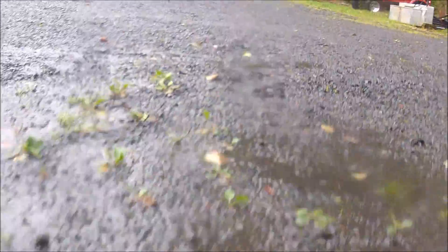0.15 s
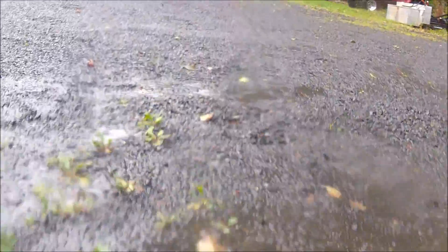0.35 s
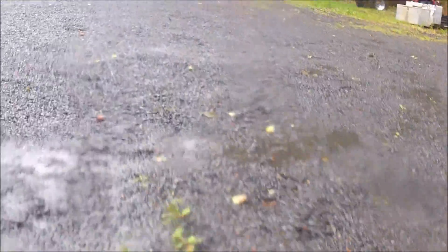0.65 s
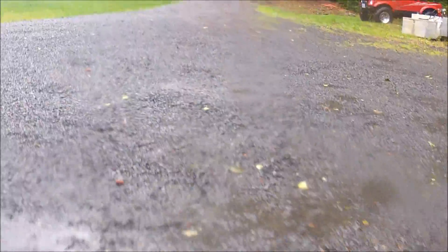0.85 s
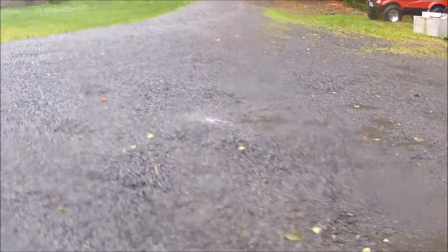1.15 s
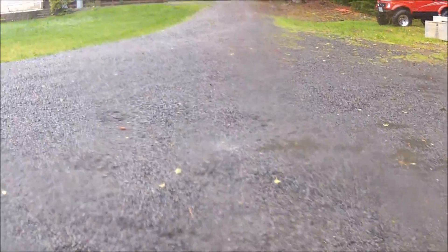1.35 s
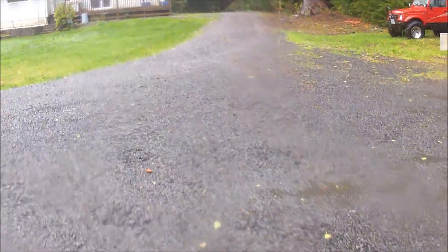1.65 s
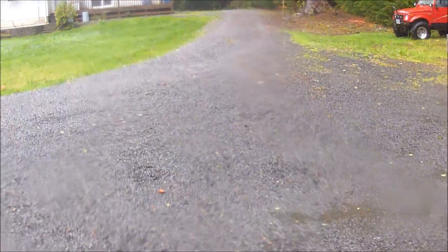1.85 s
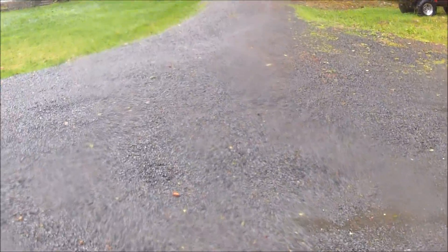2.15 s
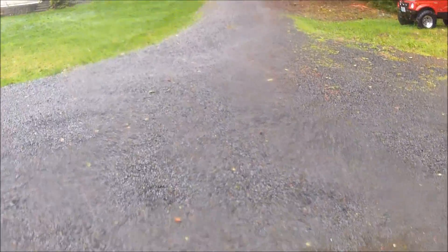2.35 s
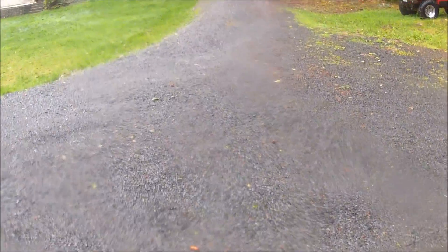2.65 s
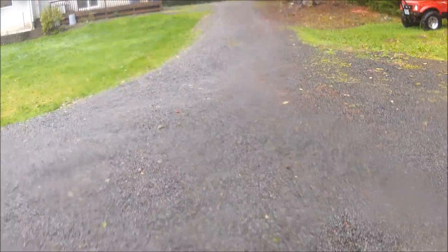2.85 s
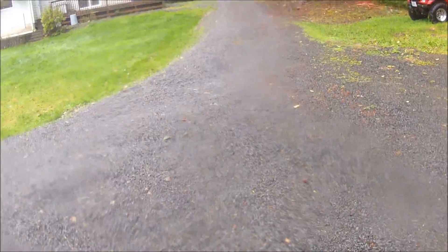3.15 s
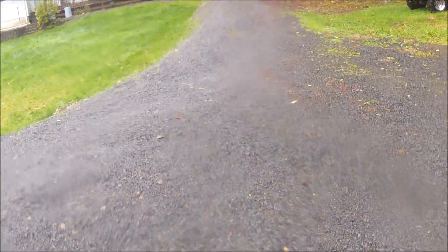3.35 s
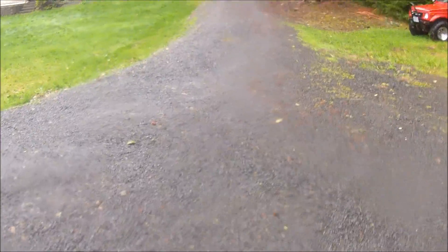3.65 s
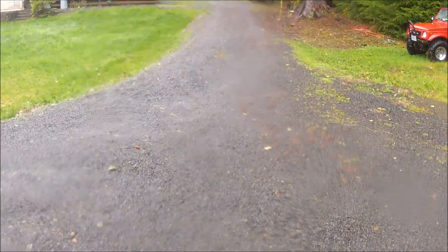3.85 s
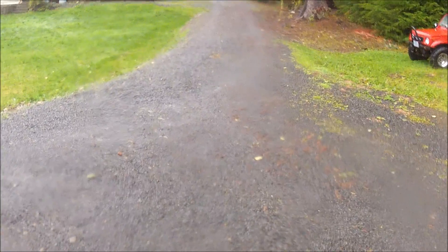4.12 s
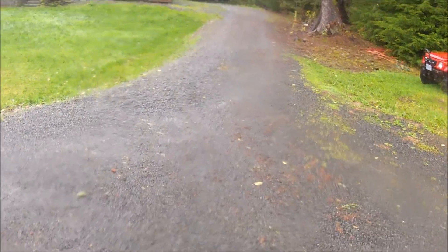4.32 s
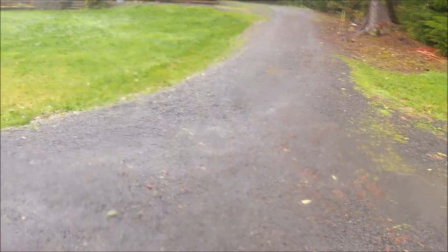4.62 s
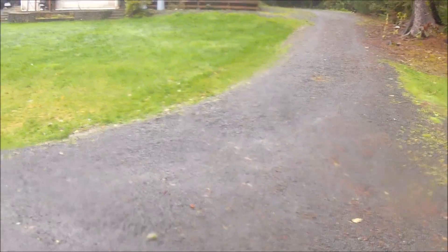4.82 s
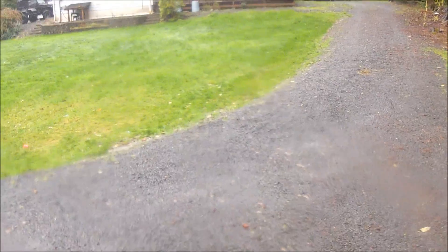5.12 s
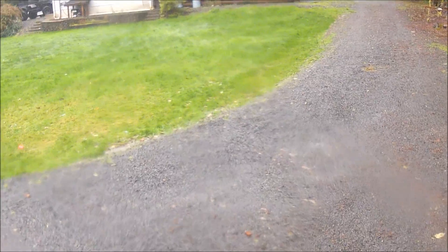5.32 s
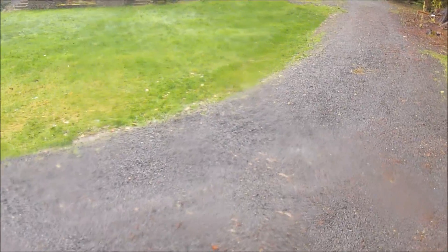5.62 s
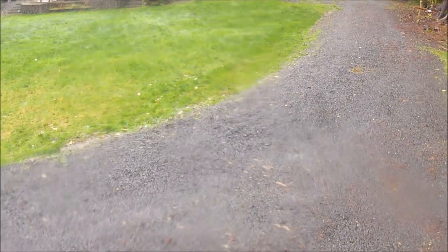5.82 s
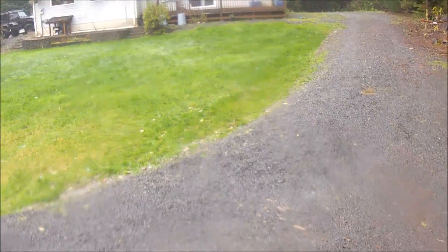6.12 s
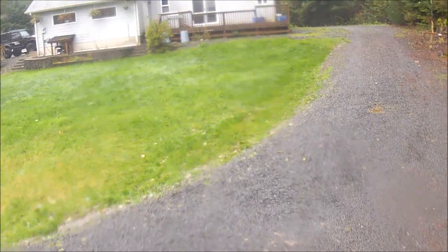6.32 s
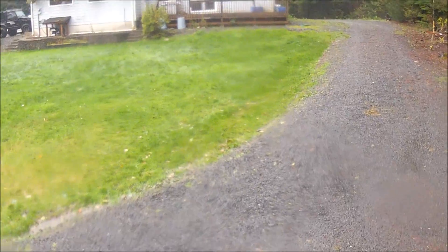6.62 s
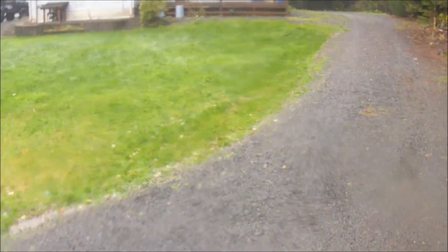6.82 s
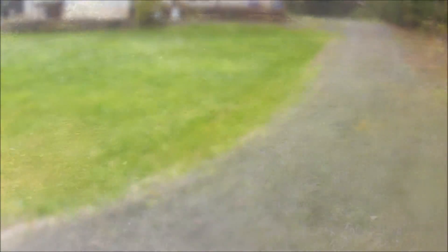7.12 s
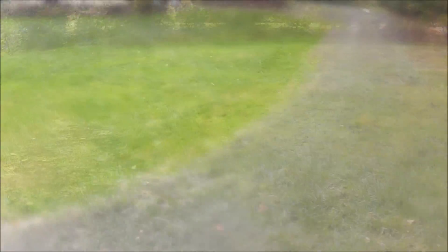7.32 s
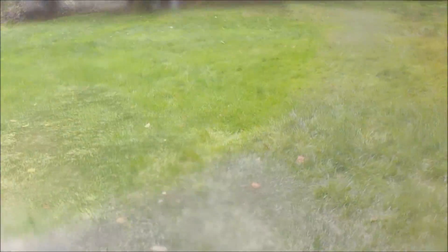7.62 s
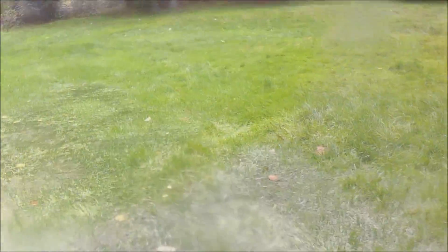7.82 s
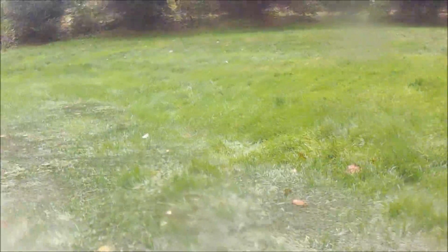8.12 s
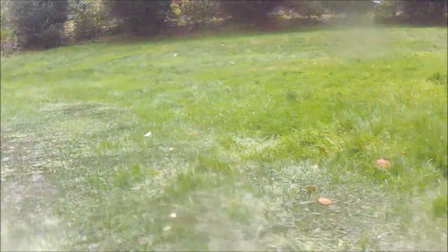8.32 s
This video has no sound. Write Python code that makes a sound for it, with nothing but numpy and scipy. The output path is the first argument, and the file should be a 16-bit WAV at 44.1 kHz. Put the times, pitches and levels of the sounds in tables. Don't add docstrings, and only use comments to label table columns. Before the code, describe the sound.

A small four-rotor drone hums and whines unsteadily, its propellers hissing, with low wind gusts rumbling through, fading quieter toward the end.

```python
import sys
import numpy as np
from scipy import signal
from scipy.fft import rfft, irfft
from scipy.io import wavfile
from scipy.ndimage import uniform_filter1d

SR = 44100
rng = np.random.default_rng(int(sys.argv[2]) if len(sys.argv) > 2 else 0)


def to_linear_factor(level_db):
    exponent = np.asarray(level_db, float) / 20
    return 10 ** exponent


def file_out(sig):
    cols = np.atleast_2d(sig).T
    lim = np.clip(cols, -1, 1)
    pcm = np.round(lim * 32767).astype(np.int16)
    wavfile.write(sys.argv[1], SR, pcm)


N = 373527
STEP_RATE = 12000
STEPS = N * STEP_RATE // SR + 40
WHINE_ORDER = 42

# (frequency [Hz], level per Hz [dB])
SHELL_RESONANCES = [(330, -51), (560, -20.5), (614, -25), (667, -14), (706, -9.5), (859, -14.5),
                    (1010, -3.5), (1110, -7.5), (1330, -1.5), (1520, -10.5), (1700, 0), (2000, -8),
                    (2170, -8), (2700, -14), (3000, -23.5), (3900, -61), (6600, -120)]


def in_time(rows):
    s, *columns = np.transpose(rows)
    t = np.arange(STEPS) / STEP_RATE
    return np.array([np.interp(t, s, column) for column in columns])


def at_hz(points, hz):
    point_hz, point_db = np.array(points).T
    return np.interp(np.log(hz), np.log(point_hz), point_db)


def rms_one(x):
    return x / np.sqrt(np.mean(x ** 2))


def drift(rate):
    r = np.exp(-2 * np.pi * rate / STEP_RATE)
    noise = rng.standard_normal(STEPS + 6000)
    slow = signal.lfilter([1], [1, -2 * r, r * r], noise)[6000:]
    return rms_one(slow - slow.mean())


def surges(rows):
    t = np.arange(STEPS) / STEP_RATE
    return sum(swing * np.cos(np.pi * np.clip((t - top) / length, -.5, .5)) ** 2
               for top, swing, length in rows)


def coloured(x, spectrum):
    hz = np.arange(STEPS // 2 + 1) * STEP_RATE / STEPS + 1
    inside = (hz > spectrum[0][0]) & (hz < spectrum[-1][0])
    return rms_one(irfft(rfft(x) * to_linear_factor(at_hz(spectrum, hz)) * inside, STEPS))


def tone(turns, multiple, flutter_db, rate):
    strength = np.sqrt(2) * to_linear_factor(flutter_db * drift(rate))
    return strength * np.sin(2 * np.pi * (multiple * turns + rng.random()))


def shaft_speeds():
    # (time [s], shaft speed [Hz])
    trim_a = [(0, 83), (.26, 87.5), (.79, 84), (1.44, 83.8), (1.8, 81.3), (2.07, 83), (2.3, 82.5),
              (2.55, 75.8), (2.72, 82.3), (3.82, 82.5), (4.1, 84.4), (4.5, 83.4), (4.86, 80.3),
              (5.36, 82.5), (5.85, 78.6), (6.28, 82.5), (6.68, 79), (8.47, 79)]
    trim_b = [(0, 85), (.5, 78.8), (.8, 78), (2.08, 84.3), (2.33, 75.2), (2.5, 77.3), (2.72, 73.5),
              (2.9, 79.3), (3.86, 78.3), (4.08, 73), (4.27, 77.3), (4.75, 71), (4.9, 76), (5.62, 85.3),
              (7.3, 84.8), (7.62, 89.3), (8.02, 89.3), (8.47, 92.7)]
    trim_c = [(0, 88.5), (.28, 82.5), (.5, 84), (2.05, 82.4), (2.36, 80.3), (2.58, 82.5), (3.0, 80.5),
              (3.4, 84.5), (4.05, 79.8), (4.31, 74.7), (4.48, 76.5), (4.75, 73), (5.2, 81.8), (6.3, 83.3),
              (7.5, 80.9), (7.7, 85.4), (8.14, 81.6), (8.47, 83.5)]
    trim_d = [(0, 82.4), (.35, 80.4), (1.15, 83.5), (1.9, 82.5), (2.24, 78), (2.7, 83.5), (3.2, 80.8),
              (4.1, 82), (4.36, 78.8), (4.6, 80.2), (4.96, 78.9), (5.7, 83.9), (6.6, 83.3), (7.26, 87.3),
              (7.6, 84.4), (7.92, 81.5), (8.47, 86.5)]
    # (top time [s], swing [Hz], length [s])
    roll_surges = [(.14, 3.8, .28), (.39, 5.4, .24), (.63, 4.3, .3), (.94, 3, .34), (1.28, 4.9, .32),
                   (1.58, 2.8, .38), (1.94, 2.4, .27), (2.2, 3, .27), (2.84, 4.7, .28), (3.14, 6.4, .34),
                   (3.43, 6.3, .28), (3.67, 5.4, .3), (3.95, 2.5, .28), (4.27, 3, .38), (4.65, 5.3, .42)]
    # (top time [s], swing [Hz], length [s])
    pitch_surges = [
        (5.98, 3.1, .5),
        (6.26, 2.2, .4),
        (6.55, 1.5, .36),
        (6.9, 1.6, .3),
        (7.13, 2.2, .26),
        (7.86, 3.2, .3),
    ]
    roll_share, pitch_share = (1, -.45, -.72, .15), (.15, 1, -.45, -.2)
    jitter_hz = .4
    trims = np.array([in_time(trim)[0] + jitter_hz * drift(3.95)
                      for trim in (trim_a, trim_b, trim_c, trim_d)])
    hunting = np.outer(roll_share, surges(roll_surges)) + np.outer(pitch_share, surges(pitch_surges))
    return uniform_filter1d(trims, size=700, axis=1) + hunting


def motor(speed_hz, whine_db, hum_db, start):
    # (frequency [Hz], level [dB])
    hum_response = [(72, -20.5), (90, -6.5), (145, -23.5), (172, -3.5), (225, -19.5), (248, -3.5),
                    (272, -8), (300, -22.5), (332, -6), (365, -13.5), (400, -16.5), (440, -25.5),
                    (490, -19.5), (540, -20)]
    # (frequency [Hz], level [dB])
    whine_response = [(2950, -11), (3050, -13), (3150, -14), (3250, -15), (3350, -13.5), (3450, -14.5),
                      (3550, -4), (3650, 1.3), (3750, -5.5), (3850, -1.5)]
    magnet_tones = {21: -14, 48: -17, 63: -10}
    turns = start + np.cumsum(speed_hz) / STEP_RATE

    hum = sum(to_linear_factor(at_hz(hum_response, k * speed_hz)) * tone(turns, k, flutter_db=2.5, rate=3.9)
              for k in range(1, 7))
    hum = hum * to_linear_factor(hum_db + 1.0 * drift(3))

    whine_level_db = whine_db + at_hz(whine_response, WHINE_ORDER * speed_hz)
    whine = to_linear_factor(whine_level_db) * tone(turns, WHINE_ORDER, flutter_db=-0.04, rate=51)

    mirror_turns = np.arange(STEPS) * 8015 / STEP_RATE - WHINE_ORDER * turns
    mirror = tone(mirror_turns, 1, flutter_db=2.0, rate=5) * to_linear_factor(-7.5 + 0.37 * whine_level_db)

    poles, *high_tones = [to_linear_factor(db) * tone(turns, k, flutter_db=4.0, rate=4.8)
                          for k, db in magnet_tones.items()]
    comb = poles + sum(tone(turns, k, flutter_db=4.0, rate=5.8) for k in range(7, 35))
    high = sum(high_tones) * to_linear_factor(.15 * (speed_hz - 92.0)) + mirror

    chop = 1 + 0.32 * np.cos(4 * np.pi * turns) + 0.26 * np.cos(2 * np.pi * turns)
    air = chop * rng.standard_normal(STEPS)
    return hum + whine, comb, high, air


def four_motors(speeds, hum_db):
    # (time [s], motor 1 [dB], motor 2 [dB], motor 3 [dB], motor 4 [dB])
    whine_levels = [(0, 1.5, -1, -1, -7), (1.4, 0, -7, 0, -6), (2.1, 2, -2, 0, -8), (2.5, -2, -2, 0, -5),
                    (3.5, 0.5, -3.5, -2, -8), (4.6, -0.5, -8, -4, -14), (5.3, -3, 2.5, -2, -14),
                    (6.6, -6, 0.5, 2.5, -13), (7.4, -5, -1, 2, -3), (7.75, -6, 0, 0, -3),
                    (8.05, -7, 1, 8, -9), (8.47, -7, 1.5, 7, -10)]
    # (coupling [dB], start angle [turns])
    arm_settings = [
        (-1, 0.1007),
        (3, .4),
        (3, .7),
        (0, .9),
    ]
    arms = [motor(hz, whine_db + 1.2 * drift(2.1), hum_db - 5.5 + arm_db, start)
            for hz, whine_db, (arm_db, start) in zip(speeds, in_time(whine_levels), arm_settings)]
    return np.sum(arms, axis=0)


def pole_tone(speed_hz):
    order = WHINE_ORDER // 2
    level = to_linear_factor(-5 + .6 * at_hz(SHELL_RESONANCES, order * speed_hz))
    return level * tone(np.cumsum(speed_hz) / STEP_RATE, order, flutter_db=1.3, rate=5)


def shell_hiss(comb, air):
    return coloured(to_linear_factor(-2.0) * rms_one(comb) + rms_one(air), SHELL_RESONANCES) * to_linear_factor(-0.7 + 1.43 * drift(26))


def bright_hiss(air, high):
    # (frequency [Hz], level per Hz [dB])
    bright_response = [(1710, -17), (2900, -7.5), (3020, -30), (3140, -4), (3290, -12), (3520, 3.5),
                       (3990, -5), (4200, -8), (4360, -15.5), (4860, -19.5), (5240, -13.5), (5500, -12.5),
                       (5740, -21), (5990, -29), (7790, -65), (13200, -120)]
    return coloured(air + high, bright_response) * to_linear_factor(-8.5 + 0.88 * drift(4.2))


def buffeting():
    # (frequency [Hz], level per Hz [dB])
    rumble_response = [(20, -20), (60, -8), (100, -13), (140, 3), (200, 1.5), (290, 0), (450, -2.5),
                       (570, -22), (640, -40)]
    # (top time [s], swing [dB], length [s])
    gust_swings = [
        (.01, 11, 0.18),
        (1.04, 13, 0.16),
        (2.62, 11.5, 0.37),
        (3.2, 6, 1.3),
        (4.0, 8, 1.1),
        (4.76, 16, 1.13),
        (5.17, 5, 0.27),
        (5.68, 8, 0.38),
        (6.9, -8, .2),
        (8.3, -1, 0.24),
    ]
    calm_db = -19.5
    return coloured(rng.standard_normal(STEPS), rumble_response) * to_linear_factor(
        calm_db + surges(gust_swings) + 0.62 * drift(4))


def held_in_steps(steps):
    low_pass = signal.cheby2(12, 22, 5850, fs=STEP_RATE, output="sos")
    held = np.repeat(signal.sosfilt(low_pass, steps), 4)
    return signal.resample_poly(held, 147, 160)[None, :N]


def scene():
    # (time [s], whole mix [dB], hum against the rest [dB])
    loudness = [(0, -20.5, -1), (.5, -19, 1.5), (.95, -20, 0), (1.85, -18, 0.2), (2.3, -19.5, 4.5),
                (2.65, -18, 2.5), (3.4, -19.5, 2.2), (4.0, -20, 2.5), (4.65, -22, 4), (5.15, -22, 5),
                (5.5, -23.5, -1), (5.76, -25, 0), (6.8, -30, -0.4), (7.1, -33, 0), (8.02, -32.5, -1.5),
                (8.28, -29.5, 0.5), (8.47, -30, -2.5)]
    # (top time [s], swing [dB], length [s])
    air_blasts = [
        (.82, 2.5, .15),
        (1.3, 1.5, 0.07),
        (1.76, 2, 0.073),
        (2.53, 1.5, 0.061),
        (3.32, 1.5, 0.12),
        (3.84, 2.5, 0.18),
        (4.8, 1, 0.15),
        (5.15, 0.5, 0.11),
        (5.66, 0.5, .2),
    ]
    level_db, hum_db = in_time(loudness)
    speeds = shaft_speeds()
    tones, comb, high, air = four_motors(speeds, hum_db)
    mix = tones + pole_tone(speeds[2]) + shell_hiss(comb, air) + bright_hiss(air, high) + buffeting()
    return held_in_steps(to_linear_factor(level_db + surges(air_blasts)) * mix)


def roll_off(x):
    return signal.sosfilt(signal.butter(12, 15440, fs=SR, output="sos"), x)


def record(dry):
    kept = np.arange(N // 2 + 1) * SR / N < 15340
    mix = irfft(rfft(dry) * kept, N)
    return roll_off(mix)


dry = scene()
out = record(dry)
file_out(out)
```